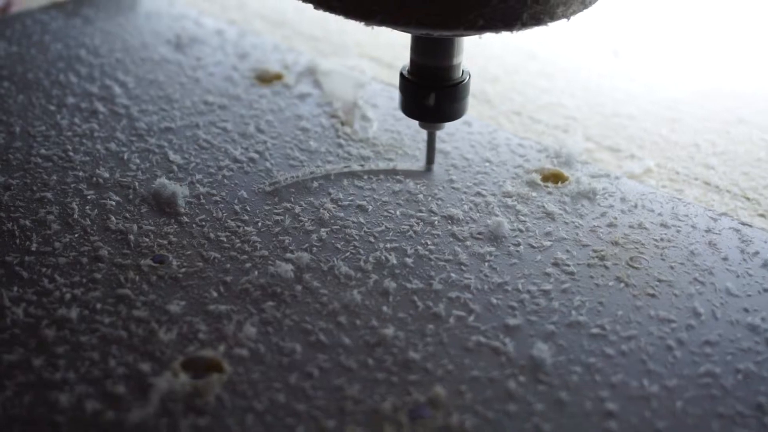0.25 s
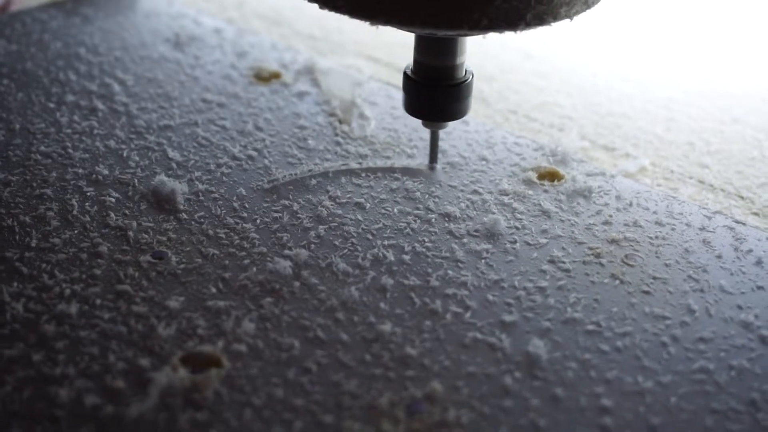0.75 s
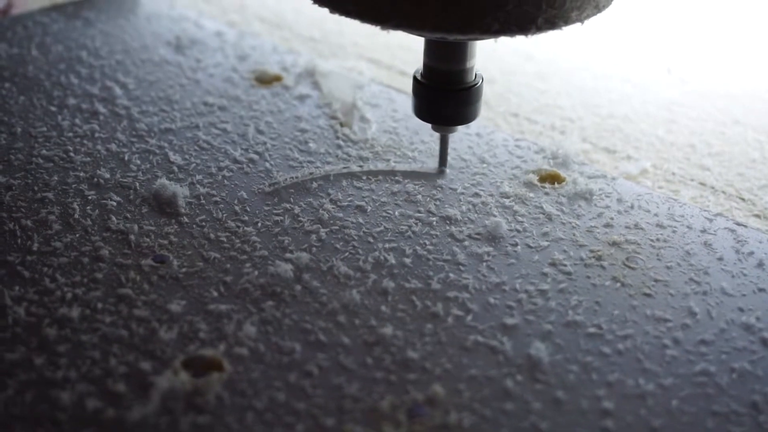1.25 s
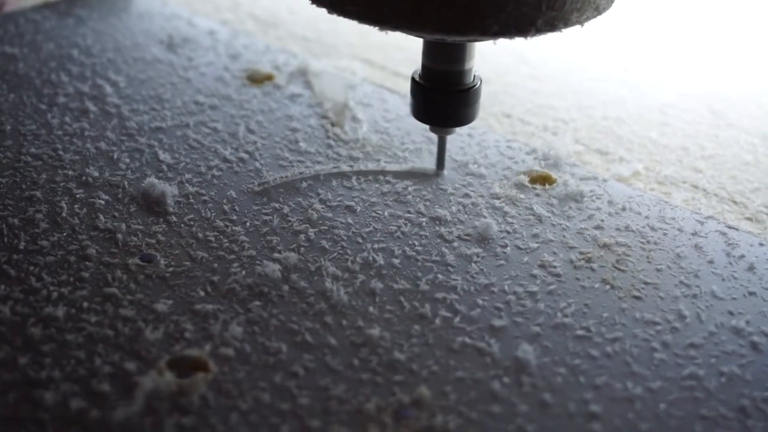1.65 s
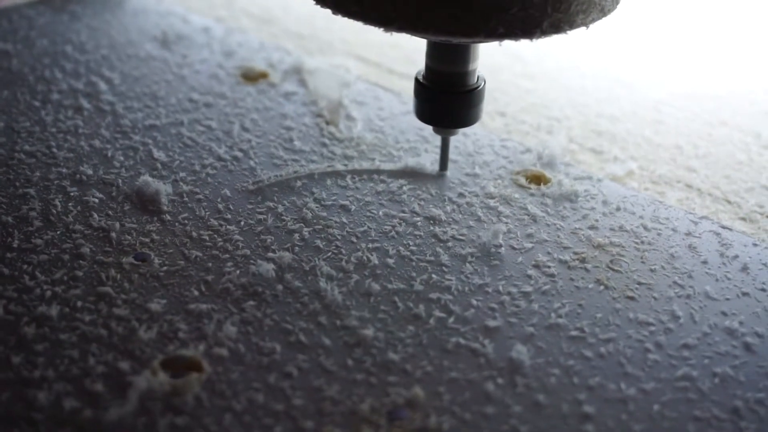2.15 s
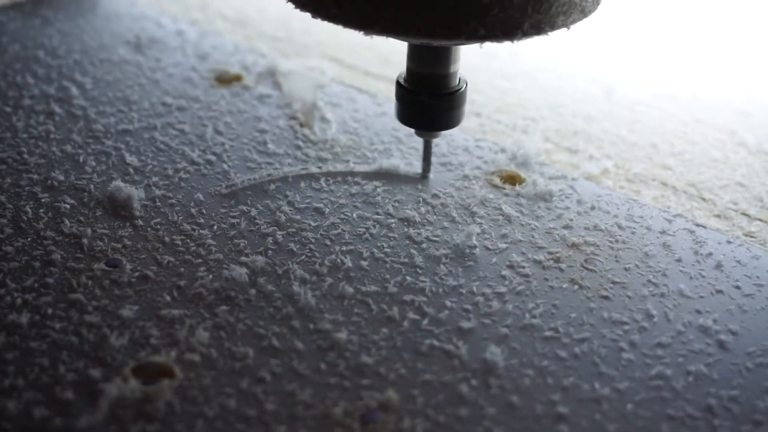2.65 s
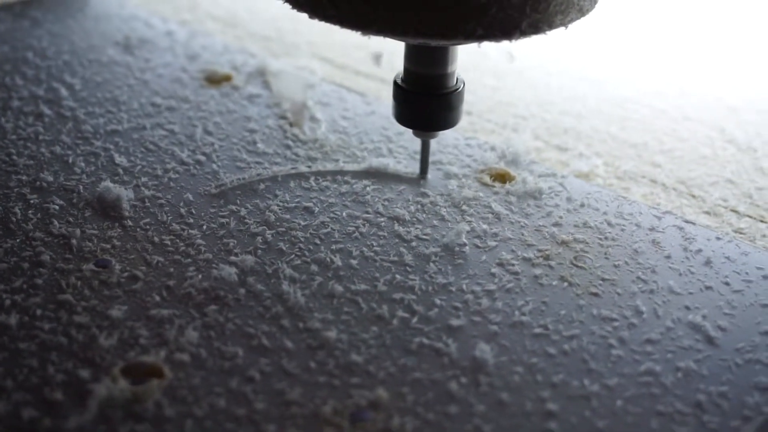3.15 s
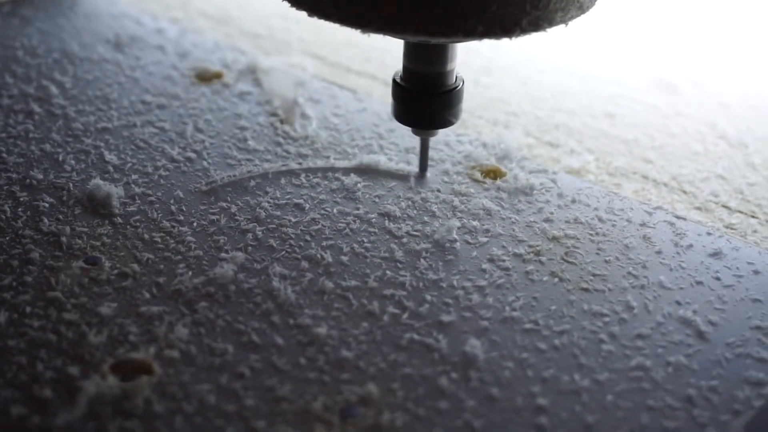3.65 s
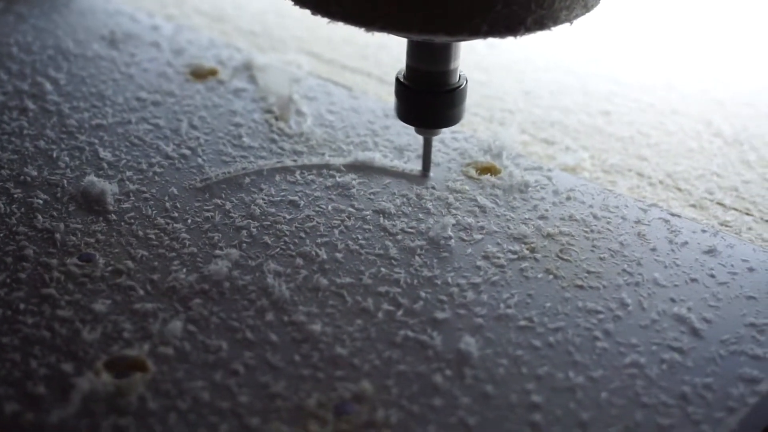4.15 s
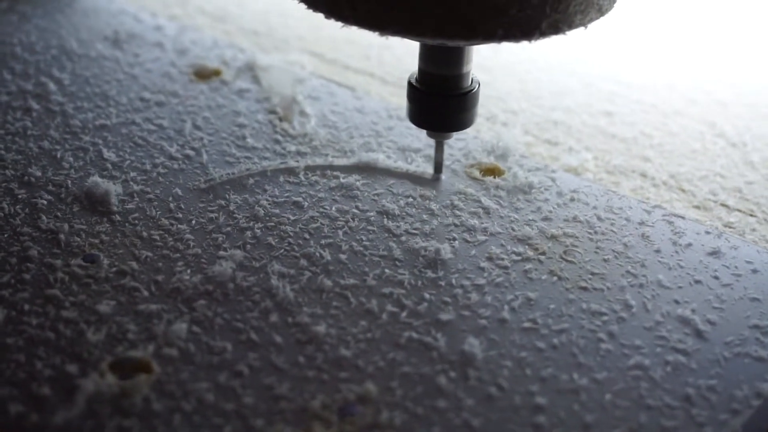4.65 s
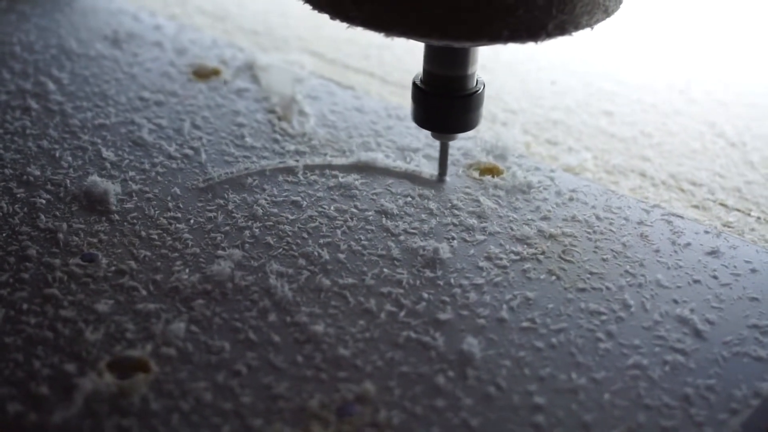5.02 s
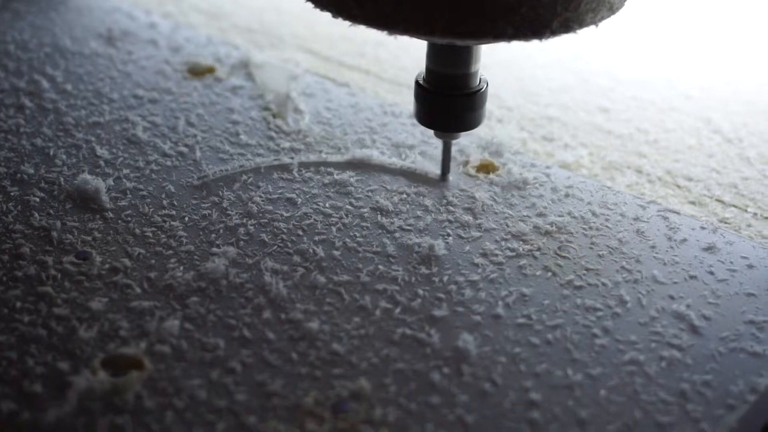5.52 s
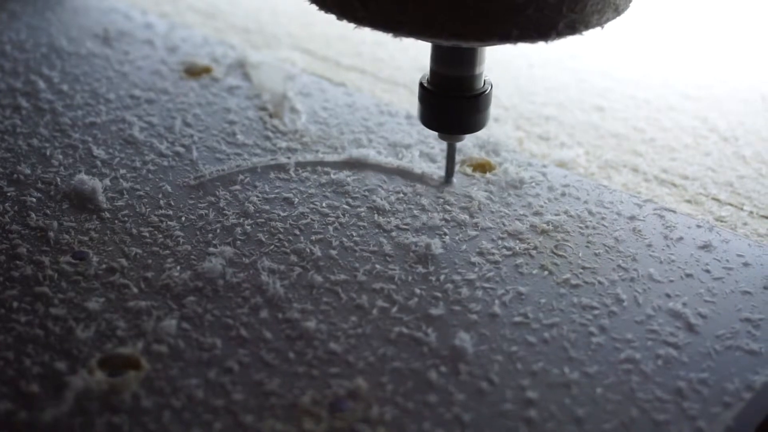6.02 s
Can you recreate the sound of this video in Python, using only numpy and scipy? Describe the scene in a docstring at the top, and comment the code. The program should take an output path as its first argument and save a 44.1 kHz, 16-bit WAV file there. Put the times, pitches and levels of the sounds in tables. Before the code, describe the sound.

Continuous shrill milling of plastic up close: a harsh, high chattering scream, fizzing chips, motor whine beneath, and a tiny double knock midway.

```python
"""Router cutting plastic sheet

A small end mill cuts plastic sheet in a workshop, close to a two-port microphone. The chattering tool is a
phase-modulated tone with an octave, split into shaft sidebands. Chips hiss as shaped noise pulsing once a turn.
The spindle whines in shaft and motor-field harmonics, which beat, over housing and air noise. The gantry adds
rumble, unsteady hums, a gliding feed motor and two decaying thuds."""
import sys
import numpy as np
from scipy import signal
from scipy.fft import rfft, irfft, next_fast_len
from scipy.io import wavfile
from scipy.ndimage import uniform_filter1d, map_coordinates

SR = 44100
rng = np.random.default_rng(int(sys.argv[2]) if len(sys.argv) > 2 else 0)


def bounce(signal):
    """Save signal as a 16-bit WAV file at the path given by the first command-line argument."""
    frames = np.transpose(np.atleast_2d(signal))
    limited = np.clip(frames, -1, 1)
    pcm = np.round(limited * 32767).astype(np.int16)
    wavfile.write(sys.argv[1], SR, pcm)


N = 276948
TIME = np.arange(N) / SR
MID_S = 3.14  # the tool passes the middle of its arc
OFF_MID = TIME - MID_S  # s
SHAFT_HZ = 399.522


def amp(db):
    """Level to amplitude: 20 dB is a factor of ten."""
    return 10 ** (np.asarray(db) / 20)


def along(points, hz):
    """Logarithmic frequency scale: interpolates each column after the frequency."""
    f, *cols = np.transpose(points)
    return [np.interp(np.log(hz + 1), np.log(f + 1), c) for c in cols]


def wobble(rate):
    """Band-limited random modulation: a smooth curve through random knots, rate of them a second."""
    knots = rng.standard_normal(int(N * rate / SR) + 4)
    return map_coordinates(knots, [TIME * rate])


def rush(spectrum, patchy_db):
    """Broadband noise with partial coherence between ports; patchy_db is the spread of its patches."""
    # Noise at the two ports. Each row: frequency in Hz, likeness from 0 to 1, left minus right in dB,
    # left lead in rad.
    ports = [(24.4, 1, 3, 0.1), (133, 0.99, -1, 0.14), (637, 1, 0, -0.043), (990, 0.27, -3, 0.63),
             (2020, 0.6, -1, -0.68), (2370, 0.4, -6.5, 0.51), (2830, 0.89, -1.5, 0.49),
             (3530, 0.2, -6, -0.054), (4280, 1, 8, 1), (5500, 0.84, -6, -1.4), (5700, 0.9, 6, 0.1),
             (6160, 1, 2, -1.8), (6950, 0.8, 9, -1.4), (7850, 0.15, -8, -1.7), (8800, 0.34, 0.5, -0.94),
             (10000, 0, -3, 0.16), (11700, 0.23, -7, -0.75), (12700, 0.6, -9, -0.25),
             (14900, 0.2, -15, -0.53)]
    z = signal.stft(rng.standard_normal((2, N + 512)), nperseg=512)[2]
    patches = uniform_filter1d(rng.standard_normal(z.shape[1:]), 6, 0)  # over frequency
    patches = uniform_filter1d(patches, 10, 1)  # over time
    pair = signal.istft(z * amp(patchy_db * patches / patches.std()), nperseg=512)[1][:, :N]

    m = next_fast_len(N + 8192)
    hz = np.fft.rfftfreq(m, 1 / SR)
    lo, hi = spectrum[0][0], spectrum[-1][0]
    closed = [(lo / 1.4, -130), *spectrum, (hi * 1.4, -130)]  # steep skirts
    density = amp(along(closed, hz)[0]) * np.sqrt(SR / 2)  # white noise spreads over SR / 2
    a, b = rfft(pair, m) * density
    alike, balance_db, lead = along(ports, hz)
    alike = np.clip(alike, 0, 1)
    left = a * amp(balance_db / 2) * np.exp(1j * lead)
    right = (alike * a + np.sqrt(1 - alike ** 2) * b) * amp(-balance_db / 2)
    return irfft([left, right], m)[:, :N]


def tone(phasor, left_db, right_db, lead):
    """Interaural-style level and phase difference: a phasor at two ports, RMS levels in dB, left lead in rad."""
    left = phasor * amp(left_db) * np.exp(1j * lead)
    right = phasor * amp(right_db)
    return np.sqrt(2) * np.real([left, right])


def slips():
    """Intermittent loss of oscillation: jam depth (each sound scales it) and the phase stepped through in rad."""
    # The chatter stumbles when a chip jams. Each row: time in seconds, depth in dB before scaling,
    # length scale in ms.
    jams = [(1.107, 9.3, 2.7), (1.98, 9.6, 7), (2.664, 10.5, 2.5), (2.839, 8.5, 3), (2.856, 12.1, 7.2),
            (3.207, 10.8, 2.3), (3.382, 7.6, 4.5), (3.855, 7.2, 1.9), (3.923, 7.4, 2.7), (4.654, 11, 6),
            (4.989, 7.5, 5), (5.074, 7.5, 4), (5.18, 6.5, 8), (5.304, 7.7, 11), (5.937, 7.1, 3.6),
            (6.083, 8.4, 2.8), (6.211, 8.2, 2.6)]
    # small stumbles come at random: mean depth before the cap, deepest (both dB before scaling), length scale
    small_mean, small_top, small_ms = 1.9, 6, 2.8
    recovery = 1.8  # recovery time over falling time
    step_per_depth = .2  # rad, spread of the phase step
    small = []
    for u, v in rng.uniform(size=(100, 2)):
        small.append((TIME[-1] * u, min(-small_mean * np.log(v), small_top), small_ms))

    jam, step = np.zeros(N), np.zeros(N)
    for s, depth, ms in [*jams, *small]:
        near = slice(max(0, round((s - .05) * SR)), round((s + .05) * SR))
        t = TIME[near] - s
        stretched = t / np.where(t < 0, 1, recovery)
        bump = np.exp(-.5 * (stretched / (.46e-3 * ms)) ** 2)
        jam[near] += depth * bump
        step[near] += step_per_depth * depth * rng.standard_normal() * bump / bump.sum()
    return jam, np.cumsum(step)


def chatter(hz, level_db, jam, step, shallow_db):
    """Self-excited bending vibration, whose rotation with the shaft splits it and its octave into sidebands."""
    # Lines one shaft multiple apart, lowest first, of the chatter and of its octave. Each row: left level in dB,
    # right level in dB, left lead in rad at mid-arc, left drift and right drift in dB per s along the arc.
    chatter_lines = [(-59.5, -59.5, 0, 0, 0), (-52.5, -52, -.4, -.6, .8), (-48.5, -49.5, 0, .2, -.1),
                     (-34.2, -41.7, 1.7, 1.5, .8), (-30.5, -35.6, -.3, -.7, .9),
                     (-20.4, -19.7, -1.1, .5, -.1), (-37.5, -26, 3.8, -1.3, .6),
                     (-20.8, -19.6, -1.6, .6, .3), (-34.5, -21, -2.4, -.6, .3), (-43, -39.5, 2, .8, .9),
                     (-39.4, -33.3, -1.2, 1.5, 1.1)]
    octave_lines = [(-52.3, -48.7, 2.8, .2, -1.8), (-47, -41.7, -1.1, 1.3, 2.4), (-50, -38.5, 1, 1, 2.3),
                    (-44.2, -36.8, .6, 0, -.4), (-41, -36, .7, 2.1, -2.3), (-37, -32.3, -.4, .8, -2),
                    (-43.5, -37.5, 3, .2, -1.1), (-51, -43.5, 3, 2.9, -1.7)]
    # Gain or fade of each chatter line toward both ends of the arc, in dB per s squared from the middle.
    bend = [-.2, -.2, .75, -.8, -.15, .45, .22, 0, -.55, .2, -.3]
    # Shaft multiple of the lowest line, off the chatter and off its octave.
    lowest_multiples = (-5, -2)
    # Drift of the left lead in rad per s, for the chatter and for its octave.
    lead_drifts = (-.06, .25)
    # per s squared from mid-arc: the chatter leans right (the octave half as much), its left port lags
    lean_db, lag_rad = .5, .1
    waver_db = .84  # slow wavering, per shaft multiple below the chatter or octave

    phase = 2 * np.pi * np.cumsum(hz) / SR + step + .04 * wobble(300) + .3 * wobble(12)
    rough_db = .2 * wobble(350) + .3 * wobble(16) + .6 * wobble(6)
    size = amp(level_db - .38 * jam + rough_db)
    scramble = .06 + .12 * jam  # rad, a jam throws the sidebands out of step
    turn = 2 * np.pi * SHAFT_HZ * TIME

    # the chatter lines lock into one burst a turn; its place and the odd lines' lag slide along the arc
    burst = 1.425 + .09 * OFF_MID  # rad
    odd_lag = .25 + .24 * OFF_MID  # rad
    smear, lower_lag = -.275, 1.2  # rad
    octave_burst, octave_lag = 1.5, 1.7  # rad, likewise, and the octave's lag behind the chatter

    out = np.zeros((2, N))
    groups = zip((1, 2), (chatter_lines, octave_lines), lowest_multiples, lead_drifts)
    for multiple, lines, lowest, lead_drift in groups:
        for k, (left, right, lead, left_drift, right_drift) in enumerate(lines, lowest):
            # each sideband leaves the sheet from other spots, which shift as the tool travels
            lead = lead + lead_drift * OFF_MID
            if multiple == 1:
                ends_db = bend[k - lowest]
                lead = lead - lag_rad * OFF_MID ** 2
                place = burst * k + smear * k ** 2 - odd_lag * (k % 2) - lower_lag * (k < 0)
            else:
                ends_db = 0
                place = octave_burst * k - octave_lag
            half_lean = lean_db / 2 / multiple
            left = left + left_drift * OFF_MID + (ends_db - half_lean) * OFF_MID ** 2
            right = right + right_drift * OFF_MID + (ends_db + half_lean) * OFF_MID ** 2

            own_phase = place + scramble * wobble(400)
            flutter_db = waver_db * max(-k, 0) * wobble(2.97) + .4 * wobble(120)
            strength = size ** multiple * amp(flutter_db - shallow_db * (k > 0))
            phasor = strength * np.exp(1j * (multiple * phase + k * turn + own_phase))
            out += tone(phasor, left, right, lead)
    return out


def chips(jam, shallow_db):
    """Amplitude-modulated fracture noise: chips tear off once a turn and burst louder when they jam."""
    # Noise of the chips before its gain. Each row: frequency in Hz, density in dB per Hz.
    chip_noise = [(5100, -78), (5400, -71.5), (5750, -68), (5880, -70), (6200, -66), (6600, -56.5),
                  (6760, -57), (6850, -71), (7020, -58.5), (7230, -68), (7390, -69), (7480, -61),
                  (7640, -62.5), (7800, -59.5), (8030, -70), (8200, -62), (8450, -63), (8600, -70.5),
                  (8850, -66.5), (9200, -69), (10200, -76.5), (11500, -76.5)]
    # Steadier hiss at the very top. Each row: frequency in Hz, density in dB per Hz.
    treble = [(12900, -77), (13250, -71.5), (13700, -70), (14100, -70), (14420, -73), (14620, -65.5),
              (14830, -72), (14950, -70), (15300, -74), (15700, -77)]
    turn = 1 + .25 * np.cos(2 * np.pi * SHAFT_HZ * TIME + 5)  # 5 rad sets where in the turn they tear off
    unsteady_db = .99 * wobble(30) + .75 * wobble(5.34)
    gain = amp(-1.5 + .49 * jam + unsteady_db - 1.8 * shallow_db)
    return rush(treble, patchy_db=2.0) + rush(chip_noise, patchy_db=1.5) * turn * gain


def spindle(unbalance_db, housing_db, jam):
    """Beating of near-equal harmonics: shaft and field tones, with housing and cooling-air noise."""
    # Steady tones of the shaft and of the motor field. Each row: multiple, left level in dB, right level in dB,
    # left lead in rad.
    shaft_tones = [(2, -43, -45.5, .5), (3, -62, -56, 1), (4, -65, -58, 1.5), (5, -67, -63, 1.1),
                   (6, -63, -53, 2.6), (7, -57, -52, .5)]
    field_tones = [(2, -50.5, -49.5, -1.1), (4, -71, -66, 1.5), (8, -61, -60, .8), (10, -65, -65, .1),
                   (11, -52.8, -52.2, .1), (13, -50, -53, -.2), (17, -50, -45, -.4)]
    # Noise of the housing and of the cooling air before their gains. Each row: frequency in Hz, density in
    # dB per Hz.
    housing_noise = [(1030, -100), (1100, -83), (1200, -76.5), (1300, -83), (1390, -93), (1540, -82),
                     (1660, -90.5), (1850, -84), (2100, -87.5), (2250, -81), (2500, -72), (2780, -67),
                     (2900, -72), (3100, -87.5), (3280, -75), (3450, -75), (3700, -84), (4150, -81.5),
                     (4280, -99), (4950, -101)]
    air_noise = [(11800, -73), (12000, -61.5), (12300, -69), (12800, -76)]
    field_hz = 399.921  # a little ahead of the shaft
    unbalance_rad = -1.95  # where in the turn the heavy side of the shaft sits

    sag = amp(.3 * wobble(30) - .19 * uniform_filter1d(jam, size=600))
    unbalance = sag * np.exp(2j * np.pi * SHAFT_HZ * TIME + 1j * unbalance_rad)
    out = tone(unbalance, unbalance_db, unbalance_db, lead=.036)

    # the shaft and field tones grow with the unbalance tone
    nearer_db = .43 * (unbalance_db - unbalance_db.mean())
    for turns, lines in ((SHAFT_HZ * TIME, shaft_tones), (field_hz * TIME + .129, field_tones)):
        for k, left, right, lead in lines:
            drift = amp(nearer_db + .7 * wobble(1.55) + .6 * wobble(20))
            drift = drift * np.exp(.1j * wobble(8))
            out += tone(drift * np.exp(2j * np.pi * k * turns), left, right, lead)

    housing_gain = amp(housing_db + .58 * wobble(150) + .16 * wobble(5.25))
    out += rush(housing_noise, patchy_db=1.5) * housing_gain
    air_gain = amp(.5 * wobble(15) - .3 * OFF_MID)  # fades .3 dB per s
    return out + rush(air_noise, patchy_db=.9) * air_gain


def feed_motor():
    """Frequency glide: the feed motor's hum and a tone at 3/4 of its pitch rise along the arc and swell once."""
    mid_hz, glide_hz_per_s = 186, 5
    phase = 2 * np.pi * np.cumsum(mid_hz + glide_hz_per_s * OFF_MID) / SR
    db = -55 - 9.5 * abs(TIME - 3.6)  # peaks at 3.6 s, falls 9.5 dB per s to both sides
    hum = tone(amp(1.7 * wobble(4.04)) * np.exp(1j * phase), db, db, 0)
    lower = tone(amp(-6.0 + 1.2 * wobble(5.1)) * np.exp(3j / 4 * phase), db, db, 0)
    return hum + lower


def thuds():
    """Damped resonance: the sheet thuds twice at the worst jam, each a decaying sine."""
    # Each row: start in seconds, peak level in dB before rise and decay.
    hits = [(2.834, -32), (2.862, -38)]
    thud_hz, t60_s, rise_s = 665, .06, .0011
    out = np.zeros(N)
    for s, db in hits:
        t = np.maximum(TIME - s, 0)
        envelope = amp(db - 60 * t / t60_s) * (1 - np.exp(-t / rise_s))
        out += envelope * np.sin(2 * np.pi * thud_hz * t)
    return out


def gantry(frame_db):
    """Structure-borne sound: rumble and frame noise, wavering hums, the feed motor and the sheet's thuds."""
    # Level of the deep rumble and the low hum. Each row: time in seconds, relative level in dB.
    deep = [(0, -9), (.7, -3), (1.1, 0.5), (1.7, -2), (2.6, 0), (3.2, -0.5), (3.7, 4), (4.2, -2.5),
            (4.9, 0), (5.4, 3.5), (5.7, 4.5), (6.28, 3.5)]
    # Noise of the rumble and of the frame before their gains. Each row: frequency in Hz, density in dB per Hz.
    rumble_noise = [(25, -94), (60, -91), (100, -90.5), (140, -83.5), (165, -89.5), (200, -81),
                    (240, -79.5), (280, -86)]
    frame_noise = [(300, -86), (360, -79), (425, -74), (465, -72), (482, -94), (575, -93), (660, -79.5),
                   (730, -84), (830, -81), (870, -88), (930, -102), (1030, -100)]
    # The frame humming unsteadily. Each row: frequency in Hz, level in dB before wavering.
    hums = [(1443, -66)]
    deep_db = np.interp(TIME, *np.transpose(deep))
    out = rush(rumble_noise, patchy_db=1.5) * amp(deep_db + 2.5 * wobble(5.1))
    out += rush(frame_noise, patchy_db=.7) * amp(frame_db + 1.9 * wobble(4.88))
    low_hum = (236.5, -63.5 + deep_db)  # Hz, dB
    for hz, db in [low_hum, *hums]:
        wavering = np.exp(2j * np.pi * hz * TIME + .8j * wobble(4.4))
        out += tone(amp(2.1 * wobble(4.7)) * wavering, db, db, 0)
    return out + feed_motor() + thuds()


def scene():
    """Superposition: the sources share one course of the cut and add linearly."""
    # The cut. Each row: time in seconds, chatter relative level in dB, shaft unbalance level in dB,
    # frame noise relative level in dB, housing noise relative level in dB.
    course = [(0, -4, -37.5, 0, -0.9), (.65, -1, -34.5, -0.5, -1.3), (.8, 0, -32.5, 2.5, -1),
              (1.4, 0, -32.5, 1.5, -2.4), (2.6, 0.75, -31, 2.5, -1.1), (4.5, 0, -29.5, 3.5, -0.3),
              (5.4, -0.5, -29, 5, 0), (6.28, -2.5, -29, 2.5, 1)]
    # Chatter frequency. Each row: time in seconds, frequency in Hz.
    pitch = [(0, 6760), (.65, 6758.5), (.78, 6749.5), (1.2, 6748), (3.6, 6749), (4.4, 6748), (6.28, 6744)]
    s, *cols = np.transpose(course)
    level_db, unbalance_db, frame_db, housing_db = (np.interp(TIME, s, c) for c in cols)
    jam, step = slips()
    hz = np.interp(TIME, *np.transpose(pitch))
    # upper lines and chips are weaker while the chatter still sings high in a shallow cut
    shallow_db = .01 * np.maximum(hz - np.median(hz), 0)
    cut = chatter(hz, level_db, jam, step, shallow_db) + chips(jam, shallow_db)
    return cut + spindle(unbalance_db, housing_db, jam) + gantry(frame_db)


def record(dry):
    """Ideal low-pass filtering: nothing passes above the band limit."""
    top_hz = 15740
    m = next_fast_len(N + 8192)
    passed = np.fft.rfftfreq(m, 1 / SR) < top_hz
    return irfft(rfft(dry, m) * passed, m)[:, :N]


dry = scene()
out = record(dry)
bounce(out)
```